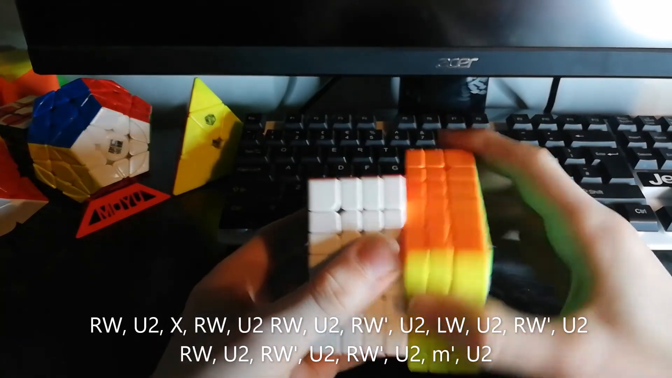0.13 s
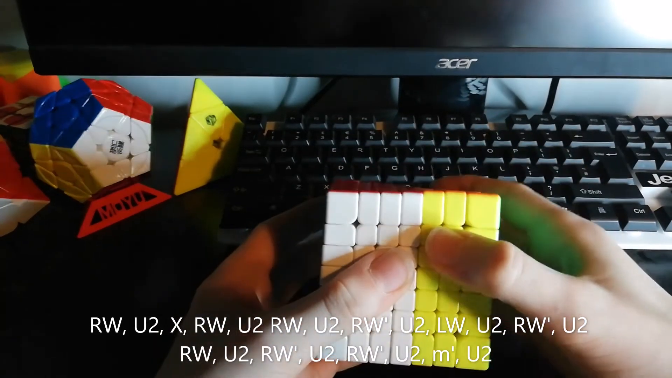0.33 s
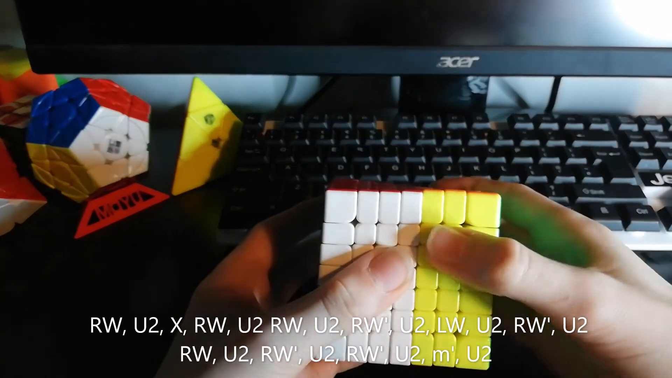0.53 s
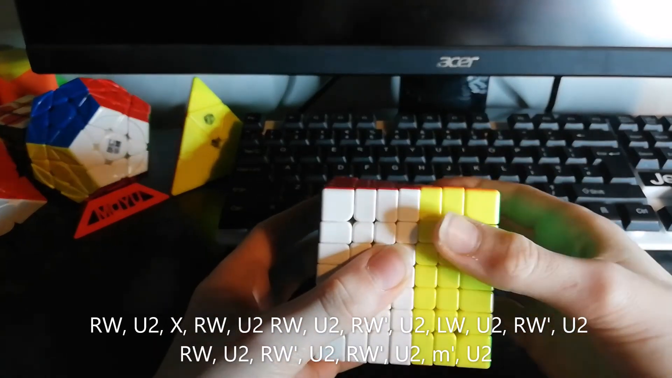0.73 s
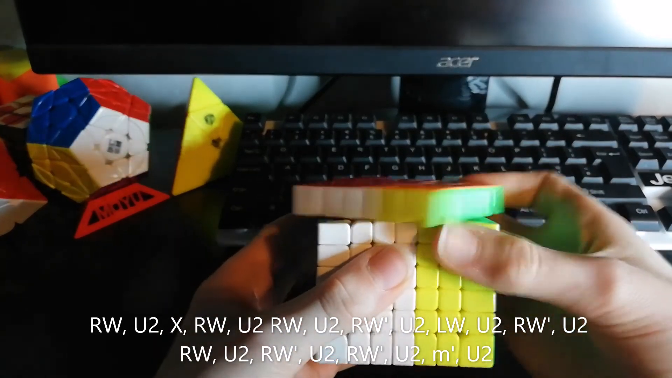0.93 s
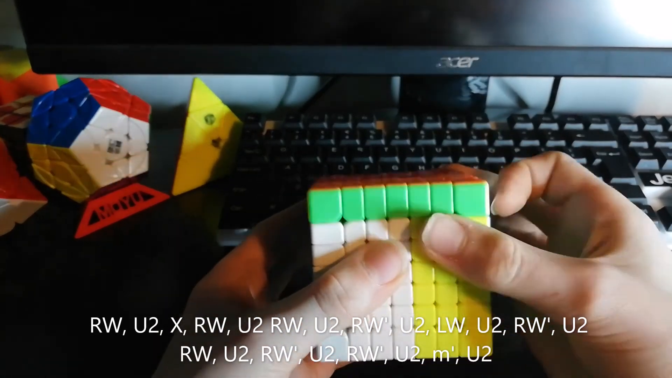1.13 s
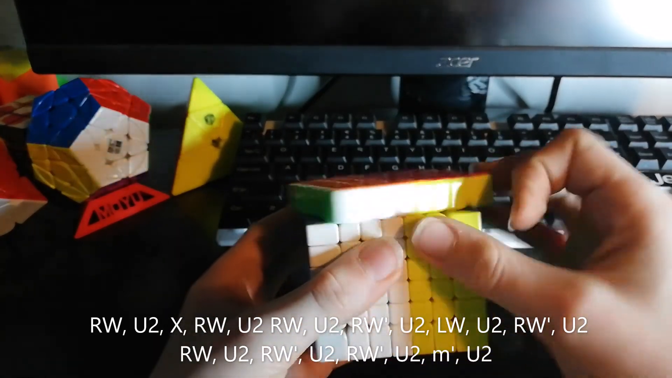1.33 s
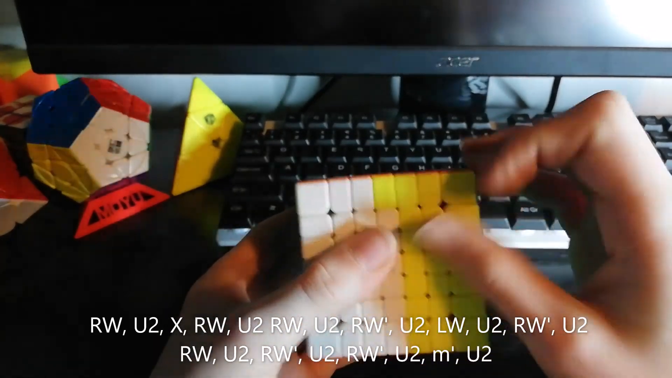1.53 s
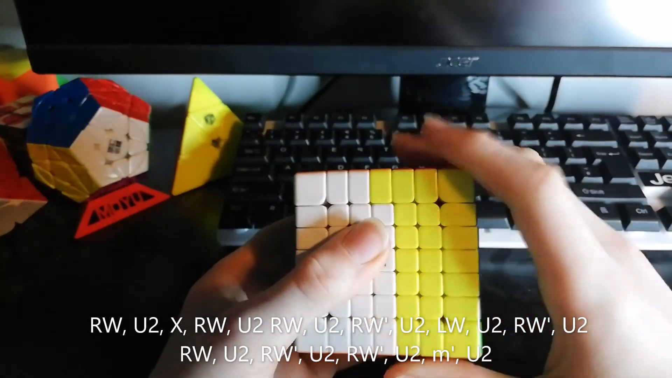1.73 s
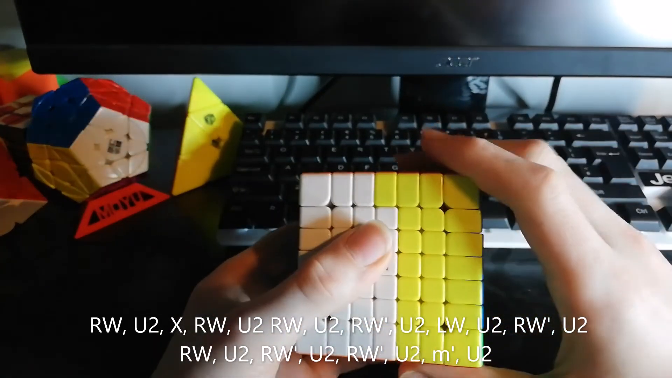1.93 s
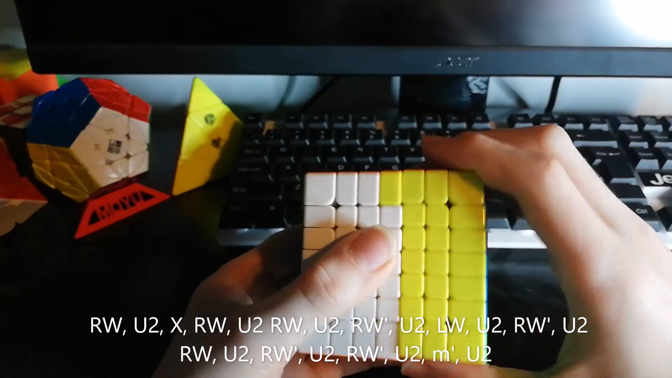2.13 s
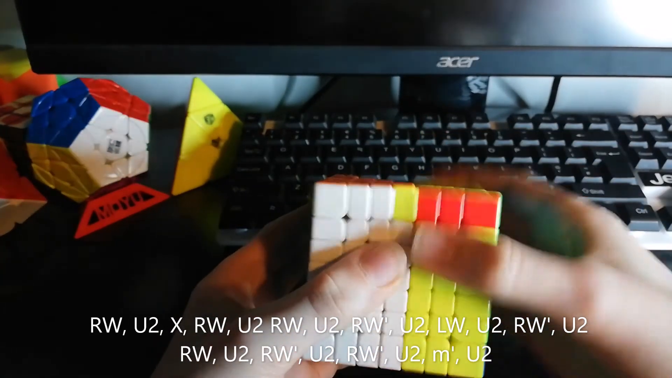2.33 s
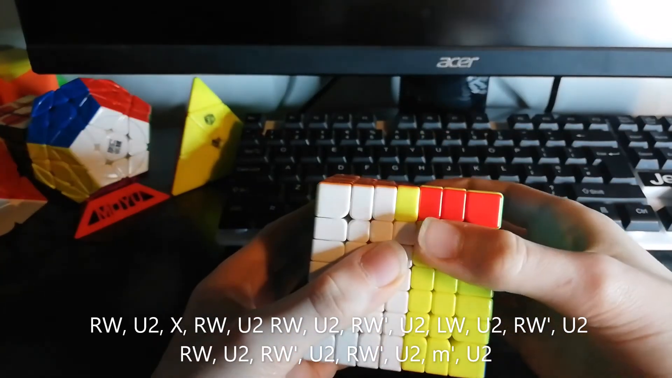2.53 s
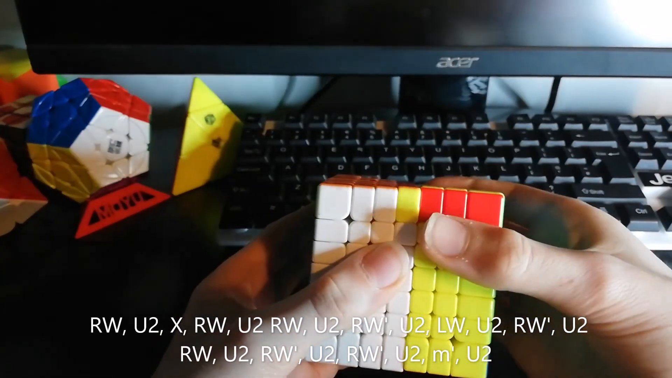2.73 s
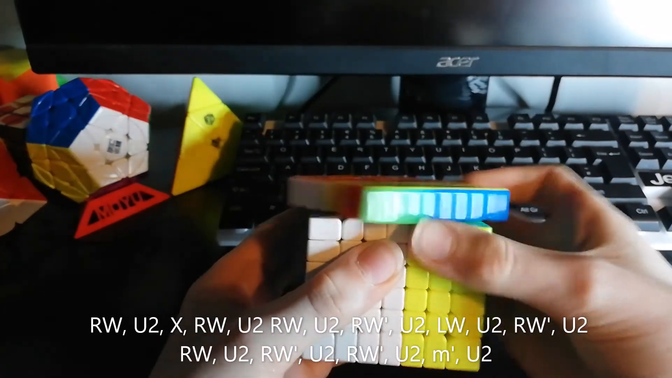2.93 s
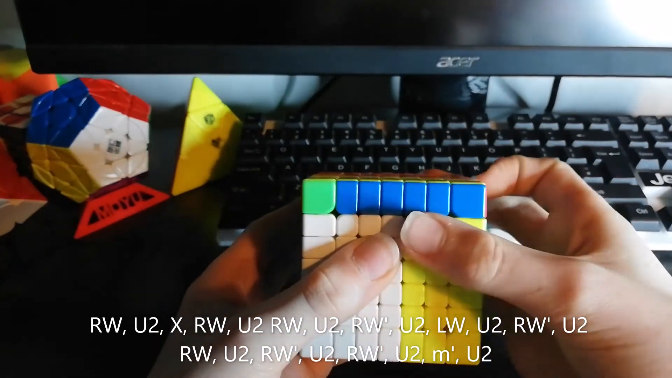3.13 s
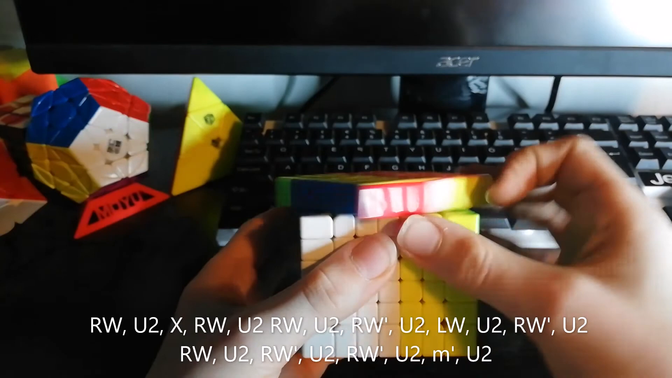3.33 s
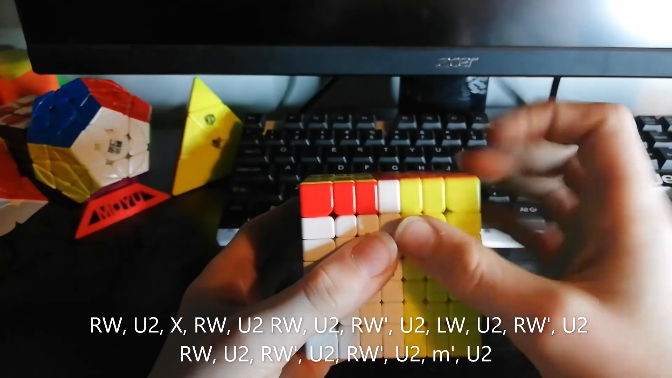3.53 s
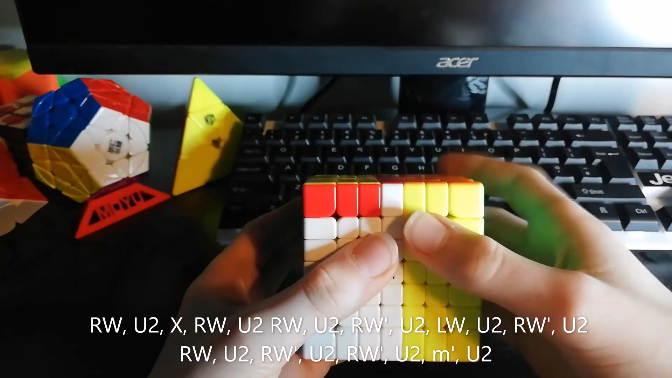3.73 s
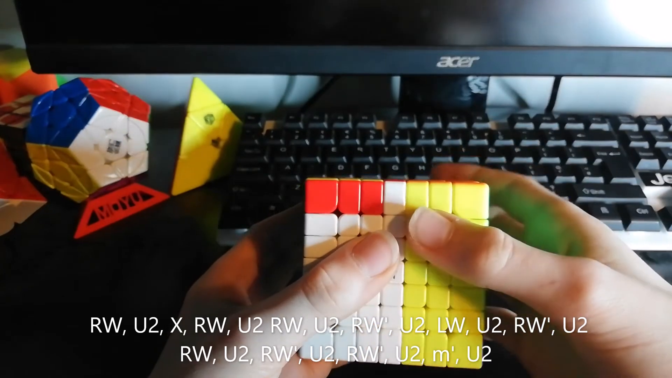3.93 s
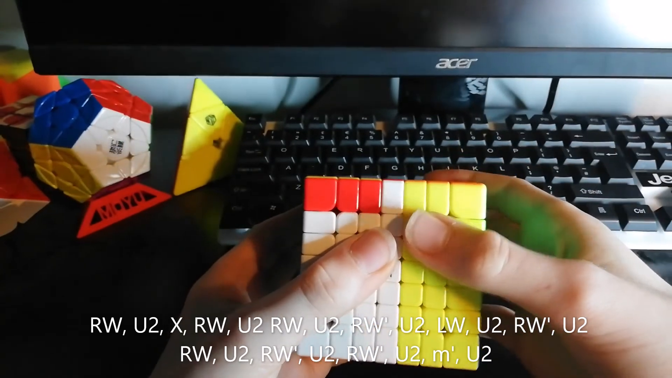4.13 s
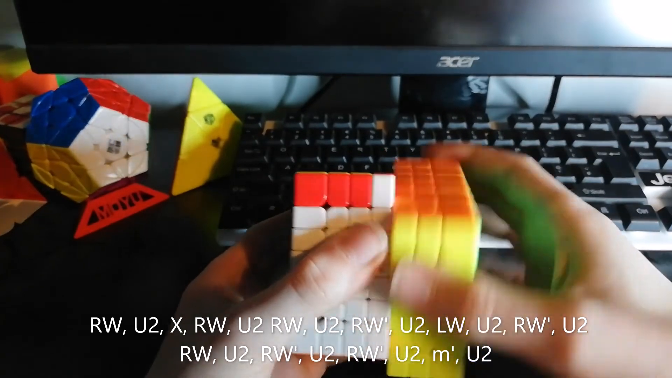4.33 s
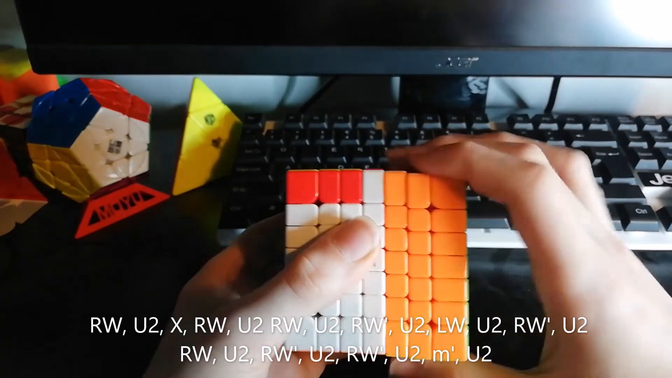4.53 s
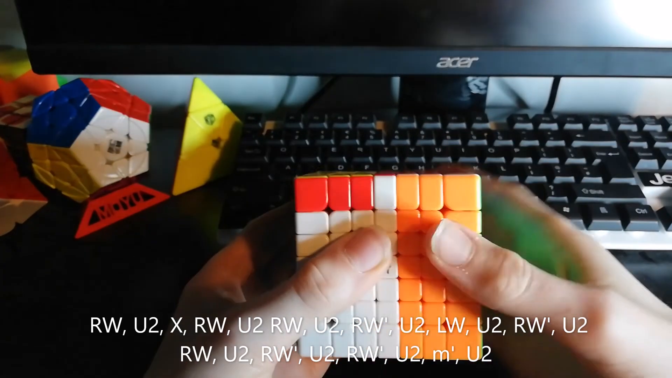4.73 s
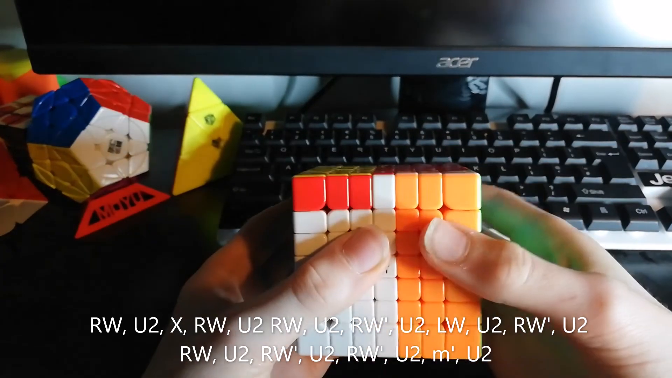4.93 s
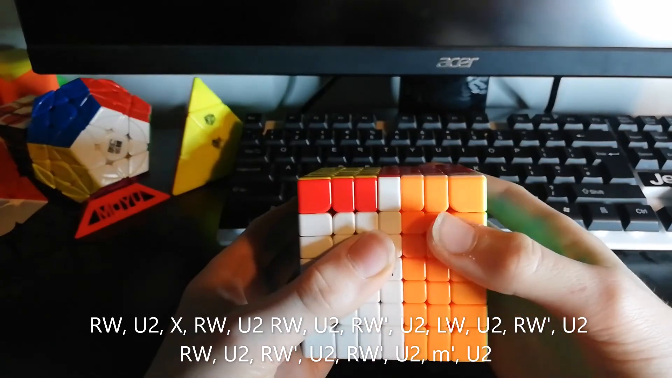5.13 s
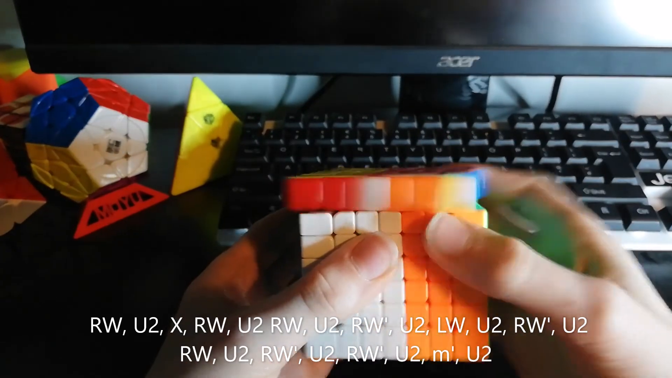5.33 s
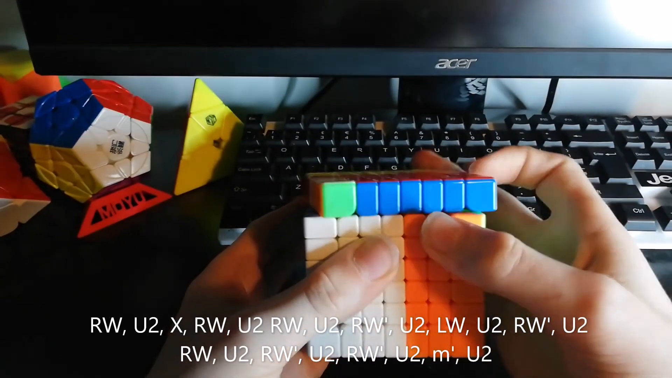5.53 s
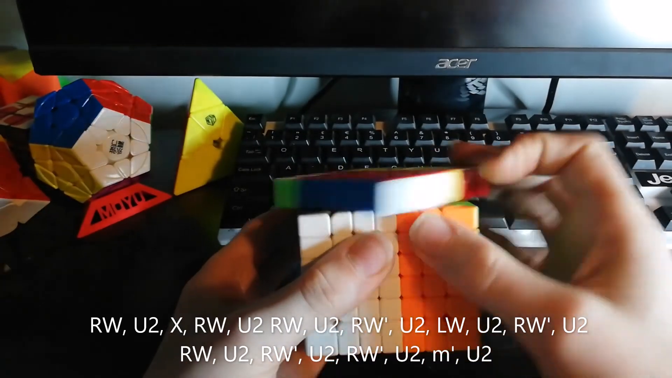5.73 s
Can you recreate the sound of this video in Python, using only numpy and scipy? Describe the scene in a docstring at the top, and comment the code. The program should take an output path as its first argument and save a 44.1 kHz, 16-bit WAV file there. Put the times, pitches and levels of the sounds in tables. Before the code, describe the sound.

A plastic puzzle cube clicks and swishes through quick moves very near the microphones. Each move starts with a light catch, then a louder scrape full of crisp ticks, sometimes a clack as the layer stops. Tiny springy pings and hollow tocks appear at times. Between moves only low room hum and soft hiss remain, with brief reflections from the desk area.

```python
"""Turning a puzzle cube

A many-layered plastic puzzle cube is turned by hand over a desk in a small quiet room, heard close and in stereo.
Scraping is a dense random train of contacts, each exciting a tiny filtered noise tick and the cube's body modes.
Edges catch and snap as brighter ticks with a bounce and a hollow knock; layers slam into stops with a dry clack.
Random bumps drive low resonances in the hands; decaying sines give thumps, spring rings and tocks.
Echoes and a short tail follow the cube, over the coloured noise of the room."""
import sys
import numpy as np
from scipy import signal
from scipy.fft import rfft, irfft
from scipy.io import wavfile
from scipy.ndimage import uniform_filter1d

SR = 44100
rng = np.random.default_rng(int(sys.argv[2]) if len(sys.argv) > 2 else 0)


def wav_out(sig):
    """Save sig, one row per channel (or a flat mono array), as 16-bit PCM at SR to the path in sys.argv[1]."""
    wavfile.write(sys.argv[1], SR, np.round(np.clip(np.atleast_2d(sig).T, -1, 1) * 32767).astype(np.int16))


N = 255780
TIME = np.arange(N) / SR

# Room hum and hiss, relative spectral density: (frequency [Hz], level [dB per Hz])
FLOOR_SPECTRUM = [(12, -49), (20, 0), (49, -4.5), (81, -6.5), (134, -9.5), (168, -11), (285, -15.5),
                  (319, -12.5), (357, -18.5), (446, -21.5), (849, -22), (1330, -20), (7110, -25.5),
                  (9400, -24.5), (16000, -34)]
# Likeness of the room noise at the two ports: (frequency [Hz], likeness [0-1])
FLOOR_LIKENESS = [(60, 0.97), (150, 0.7), (400, 0), (1200, 0), (3000, 0.05), (15000, 0.05)]
# Clearest snaps of pieces going home, before the overall snap and knock gains:
# (time [s], level [dB], piece pitch [Hz], body knock re level [dB], left minus right [dB])
SNAPS = [(0.0635, -44.5, 8000, -13, -6), (0.1038, -27, 8360, -25.5, -1.5), (0.1415, -34.5, 8750, -16, -4),
         (0.175, -35.5, 8500, -11, 2), (0.195, -32.5, 8200, -13.5, -3), (0.2455, -33.5, 8200, -38, 0),
         (0.2996, -31, 9400, -44, -2), (0.3304, -35, 10400, -17.5, 12.5), (0.3434, -40, 8000, -30, -11),
         (0.7644, -48, 10500, -16.5, -1), (0.8671, -50, 9640, -13, -1), (0.906, -43, 9600, -19, 4),
         (0.9457, -33.5, 10500, -22, 0.5), (0.9789, -25, 12600, -38, -1.5), (1.0644, -27, 10280, -21, -1.5),
         (1.1037, -45, 10000, -12.5, 1), (1.1316, -37, 8100, -19, -3), (1.2783, -41, 7600, -11, 0),
         (1.3018, -35, 9000, -12, 1), (1.3467, -31.5, 8650, -24, -4), (1.3601, -33.5, 10000, -17, 0),
         (1.429, -42, 8700, -14, -3), (1.605, -56.5, 7200, -15, 1), (2.106, -44.5, 8500, -21.5, -1.5),
         (2.2244, -36, 8300, -23, 7), (2.2298, -32.5, 6200, -21.5, -4.5), (2.3032, -36, 8614, -11, -1),
         (2.3925, -37, 8500, -11.5, -3), (2.8762, -43, 8700, -13.5, 0), (2.904, -36, 9200, -25, -2),
         (2.9654, -30.5, 8800, -23, 4), (2.9714, -31.5, 9000, -20, -4), (3.0487, -26, 11000, -17, -13.5),
         (3.0503, -22.5, 10300, -25, 1.5), (3.3154, -35, 9800, -27, -3), (3.368, -35.5, 9000, -14.5, -2),
         (3.4539, -34.5, 9500, -36, 0), (4.287, -47, 8700, -13, -2), (4.385, -37, 9600, -18.5, -1),
         (4.442, -43, 8700, -28, 4), (4.4774, -31, 7200, -22, -1), (4.5149, -32, 7940, -30, 0.5),
         (5.376, -31, 8700, -21, -5.5), (5.399, -34.5, 9300, -16.5, 12), (5.728, -42, 9000, -14, -5),
         (5.7608, -34, 9350, -25, 1), (5.7815, -34, 9150, -16, 5)]
# Colour of a snap: (frequency [Hz], relative level [dB per Hz])
SNAP_SPECTRUM = [(200, -25), (1000, -17), (2300, -16.5), (3400, -4.5), (6000, -7), (8000, -5),
                 (10500, -2.5), (12500, -6), (15800, -12)]
# Air and shell modes of the cube, before random variation: (frequency [Hz], level [dB], t60 [s])
BODY_MODES = [(731, -8.5, 0.041), (862, -2, 0.021), (899.5, 4, 0.049), (955, -5.5, 0.041),
              (1119, 2.5, 0.055), (1243, -7.5, 0.024), (1481, 3, 0.02), (1736, -2.5, 0.018),
              (2180, -19, 0.01)]
# Pushes of a finger on a layer; a move is a light take-up, a loud swing and often a nudge into line. Relative levels:
# (start [s], length [s], scrape [dB], hollow body [dB], hand rumble [dB])
PUSHES = [(0.064, 0.03, -45, -54.5, -67), (0.107, 0.12, -39, -54, -53), (0.269, 0.044, -46, -54, -75),
          (0.316, 0.035, -41.5, -59, -70), (0.855, .04, -62, -67, -83), (0.904, 0.02, -47.5, -54.5, -80),
          (0.94, 0.073, -40, -56.5, -66.5), (1.068, 0.073, -44, -57, -72),
          (1.222, 0.049, -49.5, -62.5, -76), (1.283, 0.092, -36, -49.5, -67),
          (1.408, 0.035, -48.5, -58, -80), (2.154, 0.077, -50, -59.5, -69), (2.224, 0.16, -37, -53, -58),
          (2.819, 0.041, -61, -66, -68), (2.873, 0.05, -46.5, -62.5, -76),
          (2.926, 0.061, -35.5, -52.5, -63), (3.31, 0.045, -36, -51.5, -66),
          (3.361, 0.092, -48.5, -57, -71), (4.284, 0.17, -47, -56, -72), (4.431, .084, -37.5, -52.5, -65.5),
          (4.588, 0.047, -61, -72, -70), (4.649, .28, -66.5, -85, -82), (5.262, 0.044, -63, -66, -84),
          (5.343, 0.031, -42, -52.5, -78), (5.368, 0.048, -35, -50.5, -66),
          (5.532, 0.022, -54.5, -64.5, -61), (5.614, .042, -52.5, -64, -70.5),
          (5.729, 0.05, -35, -50, -58.5)]
# Colour of the scraping: (frequency [Hz], relative level [dB per Hz])
SCRAPE_SPECTRUM = [(200, -43), (600, -15), (2000, -11.5), (2700, -7.5), (3300, -2), (4800, -5.5),
                   (6500, -4), (8200, -2), (10200, 2.5), (11400, -3.5), (12600, -7.5), (15800, -23)]
# Low resonances stirred by handling: (frequency [Hz], width [Hz], relative level [dB])
HAND_RESONANCES = [(48, 30, -9.5), (89, 27, -17), (132, 13.8, 7.5), (196, 18.2, -2), (257, 30, -14),
                   (315, 12, -7)]
# Jolts of the cube in the grip: (time [s], relative strength [dB])
JOLTS = [(0.118, -22), (2.244, -22), (2.976, -24), (3.357, -26.5)]
# Soft bumps of a hand gripping or letting go: (time [s], pitch [Hz], level [dB], t60 [s])
THUMPS = [(0.122, 333, -50, 0.13), (0.14, 204, -49, 0.17), (2.244, 80, -49, 0.085),
          (2.396, 74.6, -51, 0.089), (3.353, 327, -49.5, 0.077), (4.513, 60.3, -47.5, 0.095),
          (4.540, 100, -45.5, 0.077), (4.612, 107, -51, 0.044)]
# Plucked springs: (time [s], pitch [Hz], level [dB], t60 [s])
SPRINGS = [(0.331, 5980, -45.5, 0.082), (0.341, 3600, -39.5, 0.057), (2.227, 3350, -41.5, 0.04),
           (2.380, 3274, -43, 0.135)]
# Hollow tocks as a layer is gripped: (time [s], pitch [Hz], level [dB], t60 [s])
TOCKS = [(0.816, 1120, -59.5, .05), (2.106, 1160, -55, .04), (2.165, 895.4, -53.5, 0.06),
         (4.287, 872, -40, 0.044), (4.287, 1087, -64, 0.091), (5.273, 937, -57, 0.059)]
# Whole layers slamming into their stops: (time [s], level [dB])
STOPS = [(1.0658, -28), (3.0497, -17), (5.4, -21.5)]
# Dry clack of such a stop: (frequency [Hz], relative level [dB per Hz])
CLACK_SPECTRUM = [(150, -14.5), (500, -17), (1000, -5), (1500, -5), (2100, 10), (2900, -19.5), (4400, 8),
                  (6000, -24), (15000, -32)]
# Reverberation time: (frequency [Hz], t60 [s])
ROOM_DECAY = [(150, 0.29), (700, 0.25), (1800, 0.25), (4500, 0.23), (12000, 0.19), (16000, 0.28)]

# silence before the onset of each tick
LEAD_S = .0005
# a push bites at once, is loudest where the layer runs fastest, and dies away when the finger stops
BITE_S, ARCH_DB, FASTEST_SHARE, RELEASE_DB_PER_S = 0.0032, 4, 0.67, 596
# the weight of the layer reaches the hands a little later
HAND_LAG_S = .012
# lesser catches as a layer runs: mean spacing, level over the scraping gain, pitch, knock re level
CATCH_EVERY_S, CATCH_DB, CATCH_HZ, CATCH_KNOCK_DB = .028, -0.5, 8500, -16
# standard deviations of their level, pitch and left-right balance
CATCH_SPREAD_DB, CATCH_SPREAD_HZ, CATCH_PAN_DB = 4, 650, 0.5


def amp(db):
    """Decibel law: converts a level to an amplitude ratio."""
    return 10 ** (np.asarray(db) / 20)


def unit(x):
    """Power normalisation: scales to an rms of one."""
    return x / np.sqrt(np.mean(x ** 2) + 1e-20)


def read(points, hz):
    """Logarithmic interpolation: joins (Hz, value) points on a log-frequency axis."""
    f, value = np.transpose(points)
    return np.interp(np.log(hz + 1), np.log(f), value)


def colour(x, points):
    """Spectral shaping: multiplies the spectrum by a (Hz, dB) gain curve."""
    size = x.shape[-1]
    gain = amp(read(points, np.fft.rfftfreq(size, 1 / SR)))
    return irfft(rfft(x) * gain, size)


def add(mix, s, sound):
    """Superposition: adds a sound into the mix at time s, in place."""
    start = max(round(s * SR), 0)
    part = mix[..., start:][..., :sound.shape[-1]]
    part += sound[..., :part.shape[-1]]


def convolve(x, response):
    """Linear response: convolves channel by channel."""
    return signal.oaconvolve(np.atleast_2d(x), np.atleast_2d(response), axes=1)[:, :N]


def ports(pair, likeness, count=2):
    """Partial coherence: mixes two unrelated signals; the left port hears count samples earlier."""
    c = np.clip(likeness, 0, 1)
    right = c * pair[0] + np.sqrt(1 - c * c) * pair[1]
    return np.array([pair[0], np.roll(right, count)])


def background(level_db=-63.5):
    """Stationary noise: a low hum, alike at both ports, under an even hiss."""
    a, b = rfft(rng.standard_normal((2, N)))
    c = np.clip(read(FLOOR_LIKENESS, np.fft.rfftfreq(N, 1 / SR)), 0, 1)
    pair = np.array([a, c * a + np.sqrt(1 - c * c) * b])
    noise = irfft(pair / np.sqrt(1 + c), N)
    return amp(level_db) * unit(colour(noise, FLOOR_SPECTRUM))


def tick(hz, decay, ring_db, width_hz, spectrum, likeness, size=1024):
    """Impact excitation: a struck piece's many close modes, as noise boosted round hz, die in milliseconds."""
    t = np.arange(size) / SR - LEAD_S  # a moment of silence leaves the filters room
    neighbours = .13 * np.exp(-abs(t) / .0055)  # the pieces around it rattle a little longer
    envelope = (t > 0) * (np.exp(-abs(t) / decay) + neighbours)
    burst = ports(rng.standard_normal((2, size)), likeness) * envelope
    detuning = (np.fft.rfftfreq(size, 1 / SR) - hz) / width_hz
    ring = 1 + amp(ring_db) / (1 + detuning ** 2)
    sound = colour(irfft(rfft(burst) * ring), spectrum)
    return sound / np.linalg.norm(sound, axis=1, keepdims=True)


def knock(spread=0.023, uneven_db=7.5, port_turns=0.1):
    """Modal superposition: a blow rings the hollow cube; grip and place struck shift and favour its modes."""
    hz, db, t60 = np.transpose(BODY_MODES)[:, :, None]
    t = np.arange(4096) / SR
    detune, favour, place = rng.standard_normal((3, len(BODY_MODES), 1))
    # each mode radiates its own way, so the two ports hear it at slightly different phases
    phase = place + port_turns * rng.standard_normal((2, len(BODY_MODES), 1))
    envelope = amp(db + uneven_db * favour - 60 * t / t60)
    modes = envelope * np.sin(2 * np.pi * (hz * (1 + spread * detune) * t + phase))
    sound = modes.sum(1)
    return sound / np.linalg.norm(sound, axis=1, keepdims=True)


def turning(order):
    """Speed-dependent friction: an arched gain per push for scraping (1), hollow body (2) or hands (3)."""
    gain, t = np.zeros(N), np.arange(SR // 2) / SR
    lag = HAND_LAG_S * (order > 2)
    for start, length, *levels_db in PUSHES:
        progress = np.interp(t / length, [0, FASTEST_SHARE, 1], [0, .5, 1])
        speed = np.sin(np.pi * progress)
        release_db = RELEASE_DB_PER_S * np.maximum(t - length, 0)
        db = levels_db[order - 1] - ARCH_DB * (1 - speed) - release_db
        add(gain, start + lag, np.minimum(t / BITE_S, 1) * amp(db))
    return gain


def catches():
    """Intermittent contact: edges brush at uneven steps, following the scraping gain; rows like SNAPS."""
    scrape, rows = turning(order=1), []
    for start, length, *_ in PUSHES:
        steps = np.arange(0, length, CATCH_EVERY_S)
        late = rng.random(len(steps))
        force, piece, side = rng.standard_normal((3, len(steps)))
        s = steps + start + CATCH_EVERY_S * late
        scrape_db = 20 * np.log10(np.interp(s, TIME, scrape) + 1e-9)
        db = scrape_db + CATCH_DB + CATCH_SPREAD_DB * force
        hz = CATCH_HZ + CATCH_SPREAD_HZ * piece
        rows += zip(s, db, hz, [CATCH_KNOCK_DB] * len(steps), CATCH_PAN_DB * side)
    return rows


def clicks(snap_db=20, knock_db=24.0, bounce_db=-4, bounce_s=0.0022):
    """Impact and rebound: edges snap home as a bright tick, a quick bounce and a hollow knock under them."""
    out = np.zeros((2, N))
    for s, db, hz, body_db, pan_db in SNAPS + catches():
        gain = amp(db + snap_db) * amp([[pan_db / 2], [-pan_db / 2]])
        bounce_delay = bounce_s * rng.uniform(.5, 1.7)
        for delay, change_db in [(0, 0), (bounce_delay, bounce_db)]:
            snap = tick(hz, decay=.001, ring_db=11.5, width_hz=2300, spectrum=SNAP_SPECTRUM, likeness=0.28)
            add(out, s + delay - LEAD_S, amp(change_db) * gain * snap)
        add(out, s, amp(db + body_db + knock_db) * knock())
    return out


def contacts(per_s, spread_db):
    """Shot noise: random collisions of uneven size, their power evened over about 16 ms."""
    sizes = amp(spread_db * np.minimum(rng.exponential(1, N), 4)) * rng.choice([-1, 1], N)
    train = sizes * (rng.random(N) < per_s / SR)
    return train / np.sqrt(abs(uniform_filter1d(train ** 2, size=700)) + 0.0025)


def sliding(scrape_db=-4.0, body_db=-2, count=20):
    """Friction as many impacts: each contact ticks one of many pieces and shakes the whole cube."""
    train = contacts(per_s=1200, spread_db=1.5)
    piece = rng.integers(0, count, N)
    scrape, hollow = train * turning(order=1), train * turning(order=2)
    out = np.zeros((2, N))
    for k, hz in enumerate(np.linspace(3200, 13000, count)):
        ticks = tick(hz, decay=0.00055, ring_db=-10.0, width_hz=310, spectrum=SCRAPE_SPECTRUM, likeness=0.1)
        out += amp(scrape_db) * convolve(scrape * (piece == k), ticks)
        out += amp(body_db) * convolve(hollow * (piece == k), knock())
    return out


def hands(level_db=-1):
    """Driven resonance: layers rolling in the hands make soft bumps and odd jolts that stir low resonances."""
    hz = np.fft.rfftfreq(N, 1 / SR)
    ring = sum(amp(db) / (1 + 1j * (hz ** 2 - f ** 2) / (width * hz + 1e-9))
               for f, width, db in HAND_RESONANCES)
    ring = ring / (1 + (hz / 450) ** 4)  # soft flesh damps the treble
    ring = ring / np.sqrt(np.mean(abs(ring) ** 2))
    bumps = np.array([contacts(per_s=530, spread_db=3) for _ in range(2)])
    bumps = ports(bumps, likeness=0.68) * turning(order=3)
    for s, db in JOLTS:
        add(bumps, s, amp([db]))  # a single impulse
    return amp(level_db) * irfft(rfft(bumps) * ring, N)


def ringing(table, attack):
    """Damped oscillation: each blow sets off one dying sine, swelling with the attack time constant [s]."""
    out, t = np.zeros(N), np.arange(SR // 3) / SR
    for s, hz, db, t60 in table:
        envelope = amp(db - 60 * t / t60) * (1 - np.exp(-t / attack))
        add(out, s, envelope * np.sin(2 * np.pi * hz * t))
    return out


def stops():
    """Shell bending under impact: a hard blow is answered by a short, wide clack."""
    out = np.zeros((2, N))
    for s, db in STOPS:
        clack = tick(1650, decay=0.00048, ring_db=4, width_hz=180, spectrum=CLACK_SPECTRUM, likeness=0.52)
        add(out, s - LEAD_S, amp(db) * clack)
    return out


def room(x, early_db=-10, tail_db=-9, size=16384):
    """Reflection and reverberation: desk, keyboard and screen scatter early echoes; walls add a short tail."""
    t = np.arange(size) / SR
    taps = rng.choice([-1., 1.], (2, size)) * (rng.random((2, size)) < 5000 / SR)
    early = taps * (t > .002) * np.exp(-t / 0.0028)
    # noise fades in from 2.4 ms, then each frequency band decays at its own rate
    noise = rng.standard_normal((2, size)) * np.clip(t / 0.0024 - 1, 0, 1)
    hz, at, z = signal.stft(noise, SR, nperseg=256)
    decay = amp(-60 * at / read(ROOM_DECAY, hz)[:, None])
    tail = signal.istft(z * decay, SR, nperseg=256)[1][:, :size]
    echoes = amp(early_db) * unit(early) + amp(tail_db) * unit(tail)
    return convolve(x, echoes / np.sqrt(size))


def scene():
    """Superposition of sources: the cube and its echoes over the quiet room."""
    tones = ringing(THUMPS, attack=0.00093) + ringing(SPRINGS, attack=0.00038) + ringing(TOCKS, attack=0.00081)
    cube = clicks() + sliding() + hands() + tones + stops()
    return background() + cube + room(cube)


def record(dry):
    """Band limitation: a linear-phase low-pass at 16 kHz."""
    lowpass = signal.firwin(301, 16000, window=("kaiser", 8), fs=SR)
    return signal.oaconvolve(dry, lowpass[None], "same", axes=1)


dry = scene()
out = record(dry)
wav_out(out)
```